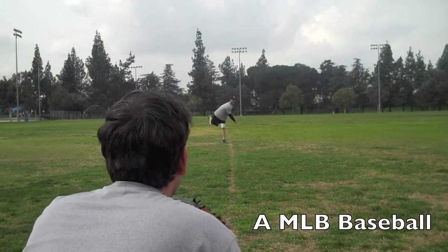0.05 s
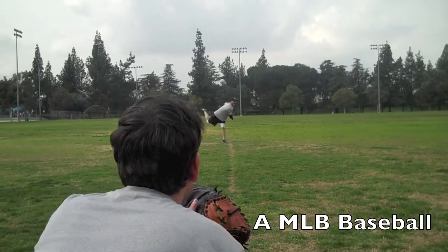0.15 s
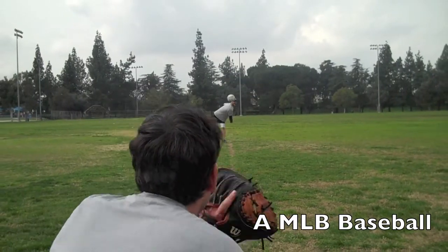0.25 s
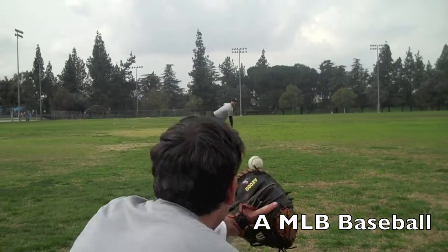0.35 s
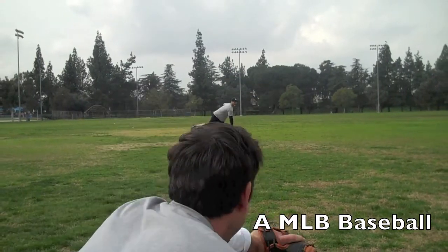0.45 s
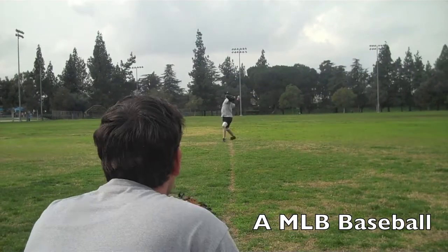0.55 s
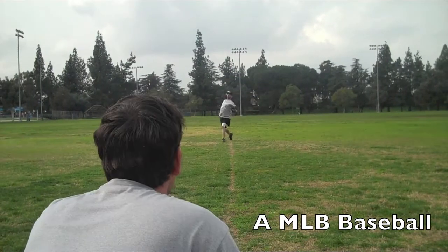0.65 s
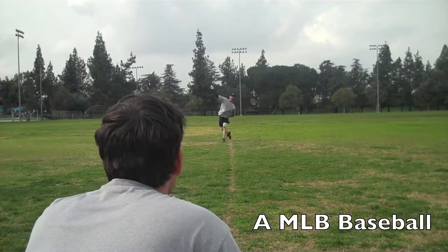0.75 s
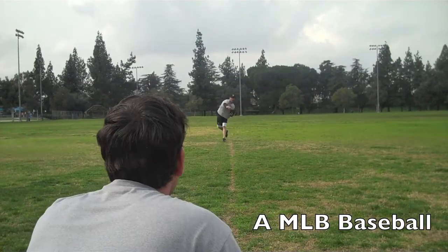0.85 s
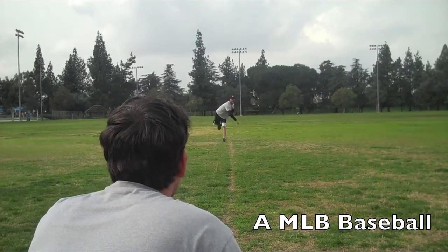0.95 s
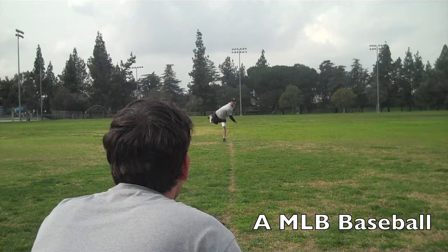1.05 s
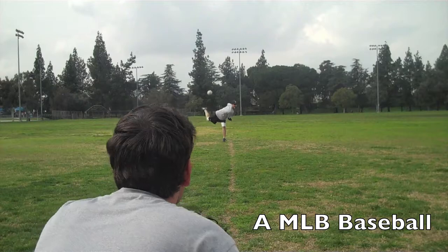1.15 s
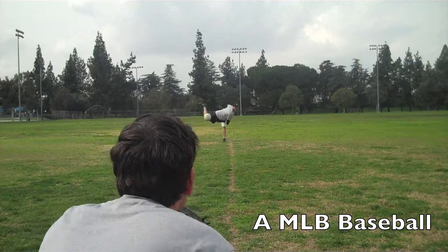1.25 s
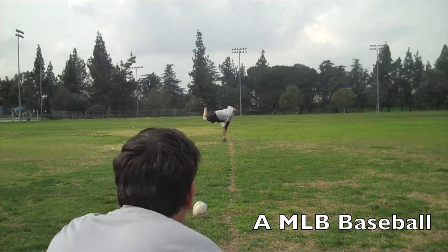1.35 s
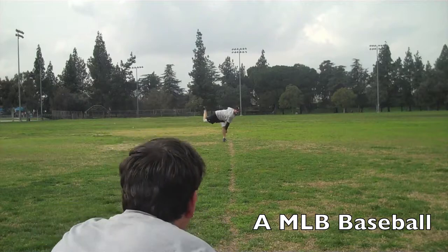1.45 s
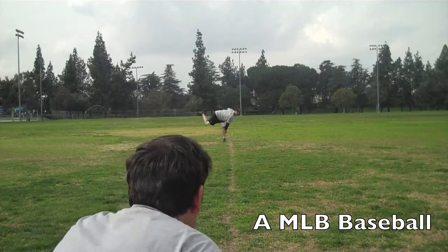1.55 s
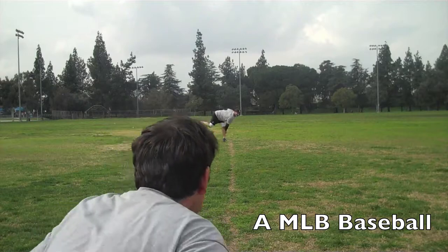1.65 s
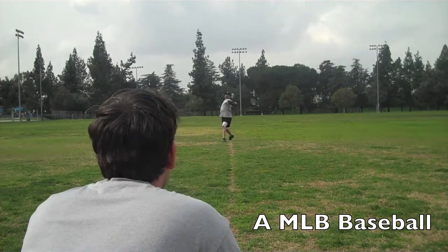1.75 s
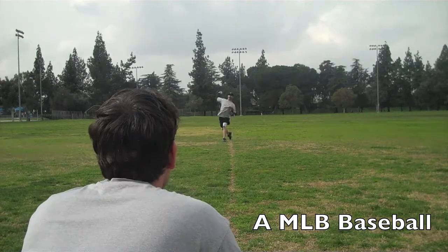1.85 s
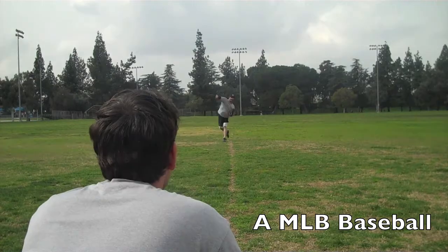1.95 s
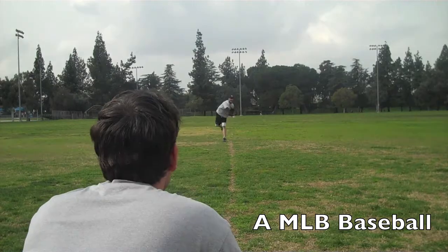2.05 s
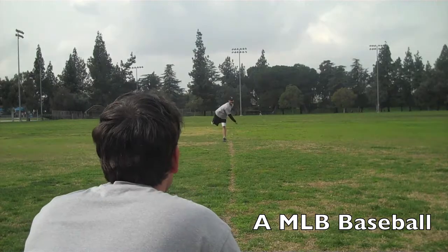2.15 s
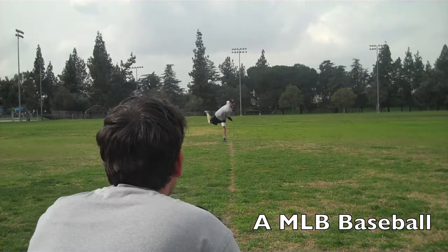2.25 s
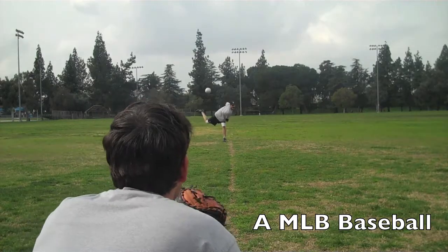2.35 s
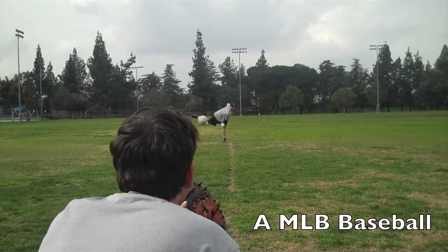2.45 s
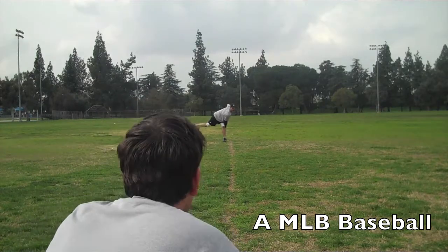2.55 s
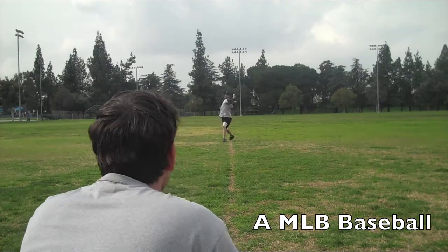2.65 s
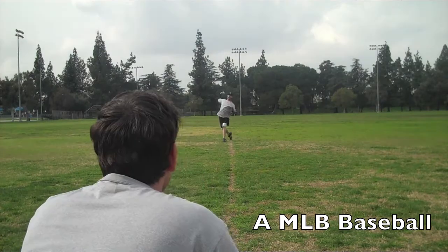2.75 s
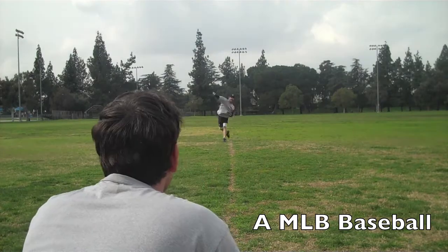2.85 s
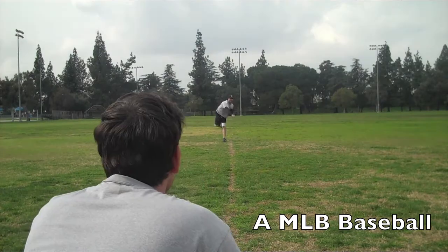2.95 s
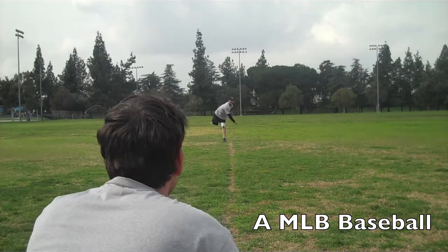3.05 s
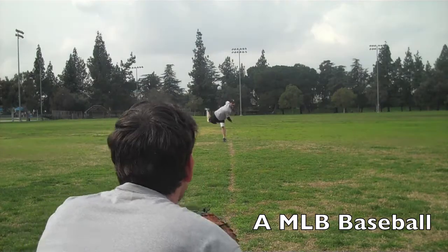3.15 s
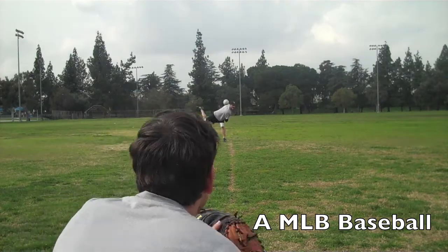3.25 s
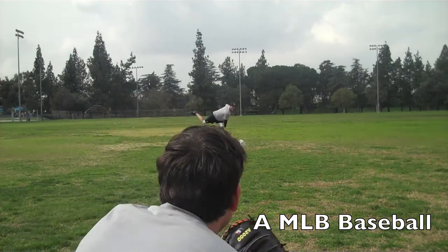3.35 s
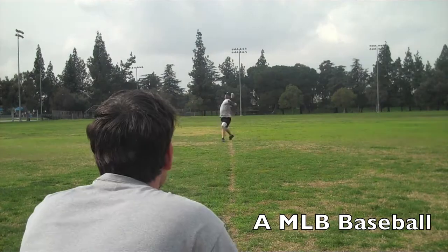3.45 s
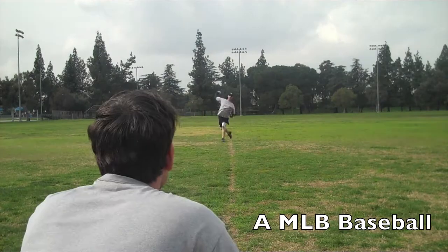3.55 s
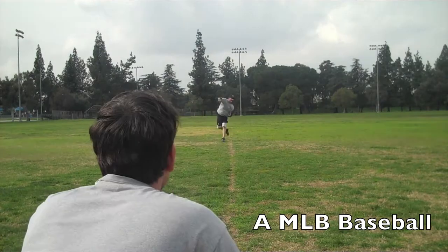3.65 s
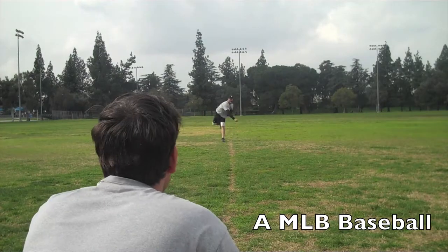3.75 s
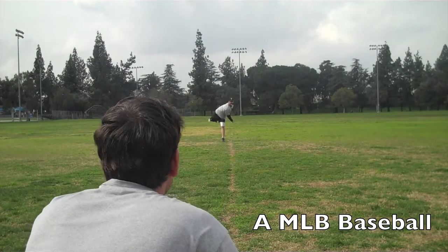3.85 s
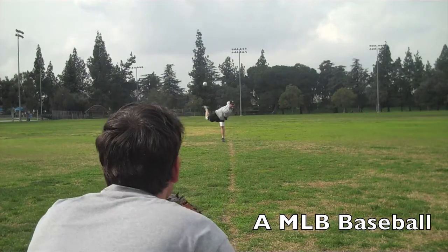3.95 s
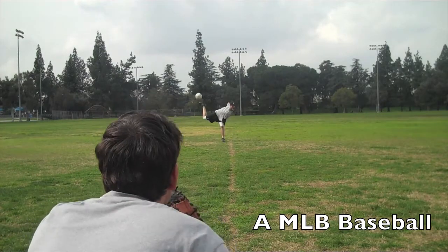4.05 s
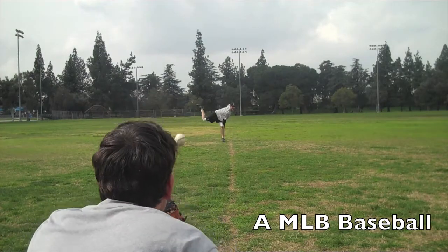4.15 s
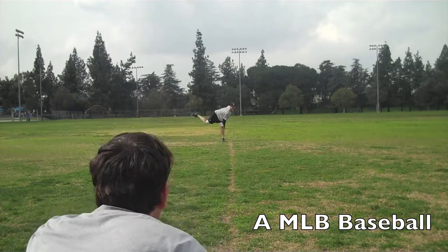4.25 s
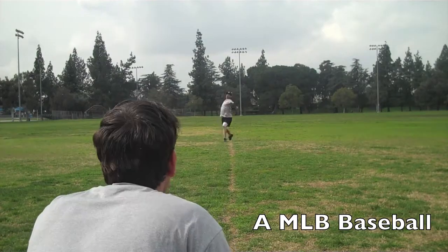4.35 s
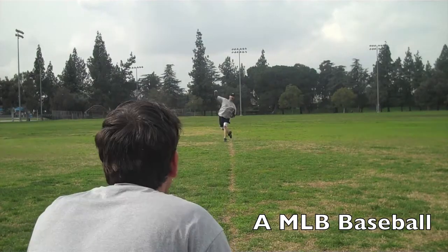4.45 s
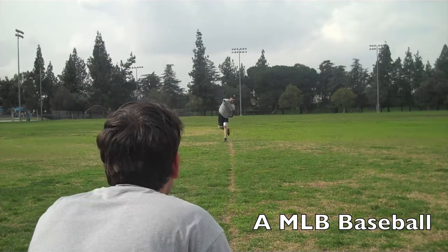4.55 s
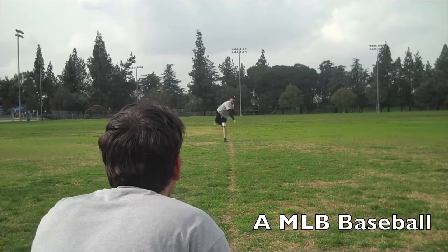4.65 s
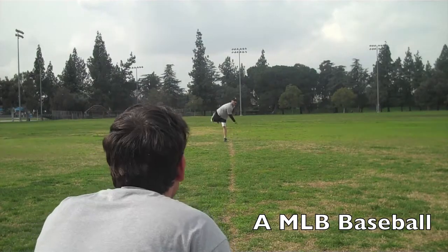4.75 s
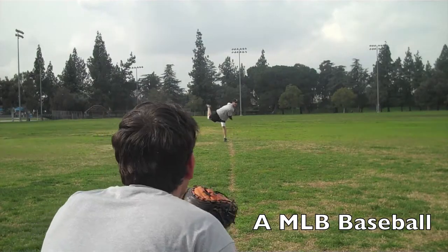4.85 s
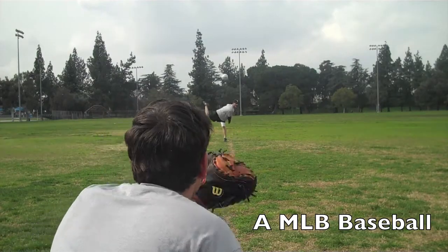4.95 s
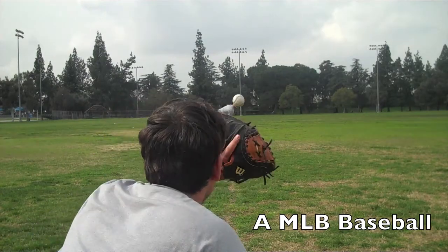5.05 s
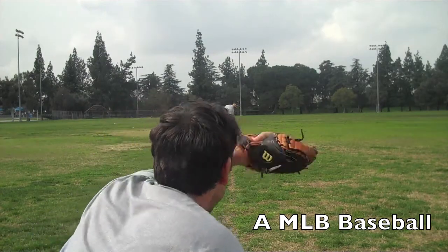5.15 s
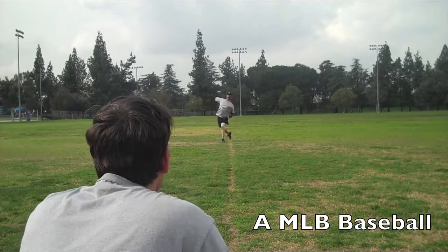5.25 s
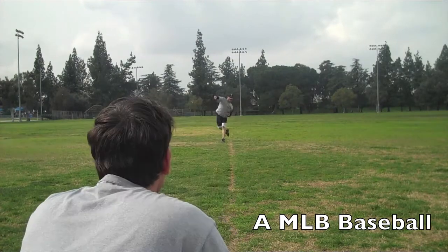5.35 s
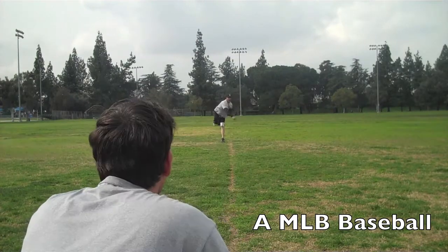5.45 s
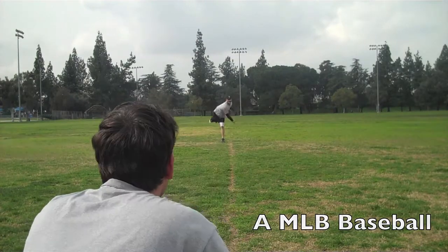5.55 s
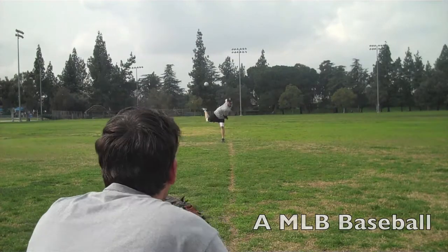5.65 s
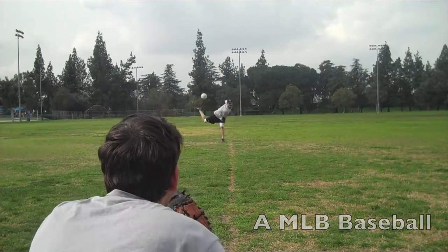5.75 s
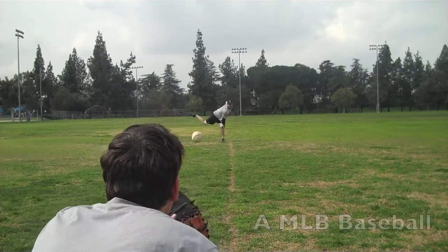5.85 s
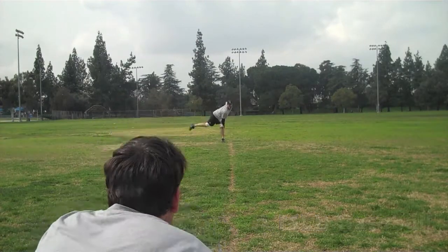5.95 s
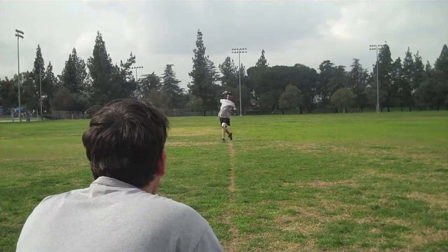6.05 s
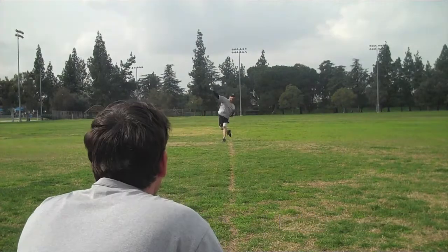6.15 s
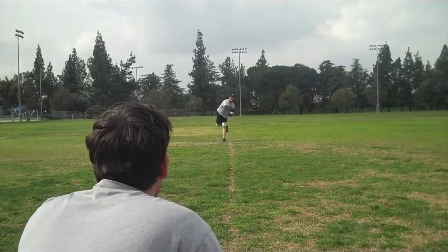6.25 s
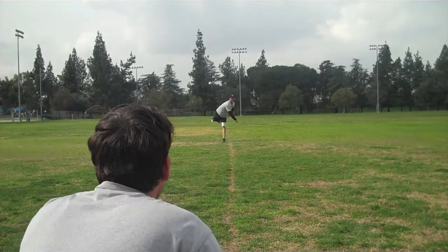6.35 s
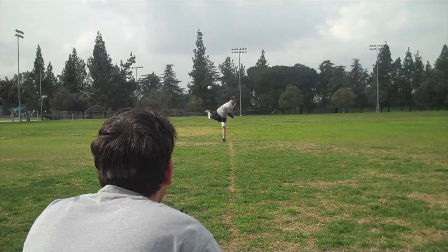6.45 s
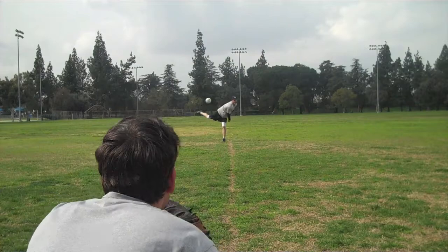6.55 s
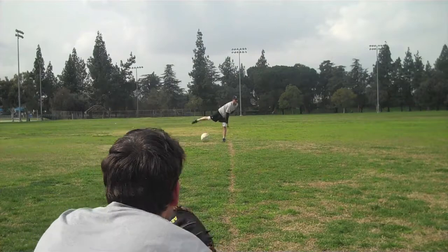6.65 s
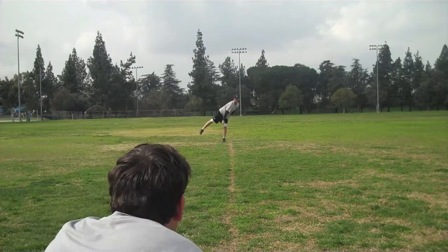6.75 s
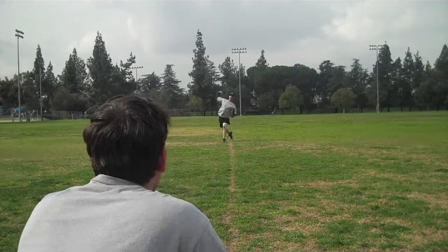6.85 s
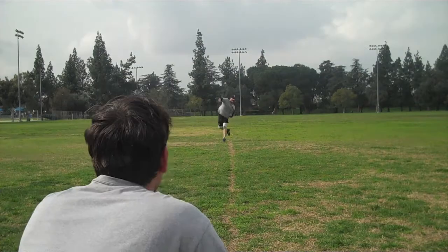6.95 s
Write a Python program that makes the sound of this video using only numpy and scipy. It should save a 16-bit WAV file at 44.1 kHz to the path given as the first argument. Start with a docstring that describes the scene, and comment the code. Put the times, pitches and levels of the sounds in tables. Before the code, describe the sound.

Close to the microphone, eight baseballs crack into a leather mitt, roughly one a second, each so loud it clips, with a short leathery ring and faint echo. Behind lies an open park: low far traffic, engine hums, thin hiss. Midway a helicopter thuds nearer, then roars past overhead; tiny bird chirps appear between catches. The background shifts at each cut.

```python
"""Far traffic rumbles and rushes over an open park field, then eight pitches smack into a leather mitt.
Traffic, hiss and a low rumble are coloured noise, with sliding sines for far engines. Each catch sums damped
resonances and noise bursts, clips flat, and returns as a near reflection and a faint tick from across the field.
Small birds are gliding sines; a helicopter approaches as pulses and chopped wash, then roars overhead.
The sound runs in nine stretches, each with its own field levels, joined by short fades."""
import sys
import numpy as np
from scipy import signal
from scipy.fft import rfft, irfft
from scipy.io import wavfile
from scipy.ndimage import uniform_filter1d

SR = 44100
rng = np.random.default_rng(int(sys.argv[2]) if len(sys.argv) > 2 else 0)


def master(y):
    """Save y as 16-bit WAV."""
    cut = np.clip(np.atleast_2d(y).T, -1, 1)
    pcm = np.round(cut * 32767)  # scale
    wavfile.write(sys.argv[1], SR, pcm.astype(np.int16))


N = 308259
TIME = np.arange(N) / SR
FAR_LAG_S = 0.00011  # far sounds reach the left port first


def undb(db):
    """Level law: decibels to an amplitude ratio."""
    return 10 ** (np.asarray(db) / 20)


def noise(colour, size, comb_s=0., comb=0.):
    """Spectral shaping: noise of rms 1 with a (frequency, level) colour; a delayed ground bounce may comb it."""
    hz = np.maximum(np.fft.rfftfreq(size, 1 / SR), 1)
    points, db = np.transpose(colour)
    rolloff = np.minimum(points[-1] / hz, 1) ** 3  # above the last point
    gain = undb(np.interp(np.log(hz), np.log(points), db)) * rolloff
    bounce = comb * np.exp(-2j * np.pi * hz * comb_s)
    gain = gain * np.abs(1 + bounce)
    x = irfft(rfft(rng.standard_normal(size)) * gain, size)
    return x / x.std()


def pair(colour, size, width, pan_db=0., comb_s=0., comb=0., lag_s=0.):
    """Partial coherence: two ports share mid noise and differ by side noise; the right may hear it later."""
    mid = noise(colour, size, comb_s, comb)
    side = noise(colour, size, comb_s, comb)
    sign = np.array([[1], [-1]])
    both = (mid + width * sign * side) / np.hypot(1, width)
    left, right = both * undb(sign * pan_db / 2)  # positive pan favours the left
    return np.array([left, np.roll(right, round(lag_s * SR))])


def decay(t, t60):
    """Exponential damping: a fall of 60 dB in t60 seconds, silent before t = 0."""
    return (t >= 0) * np.exp(-np.log(1000) * np.maximum(t, 0) / t60)


def mode(t, hz, t60):
    """Free vibration: one damped resonance."""
    return np.sin(2 * np.pi * hz * t) * decay(t, t60)


def add(out, start, x):
    """Superposition: mix x into out from a given time [s] on."""
    i = max(int(start * SR), 0)
    out[:, i:i + x.shape[-1]] += x[..., :N - i]


def glide(length, first_hz, last_hz):
    """Frequency modulation: a sine of rms 1 whose phase accumulates a linearly sliding pitch."""
    hz = np.linspace(first_hz, last_hz, int(length * SR))
    return np.sqrt(2) * np.sin(2 * np.pi * np.cumsum(hz) / SR)


def walk(rate):
    """Random fluctuation: values drawn at a rate [Hz], smoothed twice, with standard deviation 1."""
    k = int(SR / rate)
    steps = np.repeat(rng.standard_normal(N // k + 1), k)
    x = uniform_filter1d(uniform_filter1d(steps, k), k)[:N]
    return x / x.std()


# hum of far engines, sinking as they pass:
# (start [s], end [s], first pitch [Hz], last pitch [Hz], level [dB])
ENGINE_HUMS = [(0, 0.658, 119.5, 115.7, -40), (0, 0.285, 359, 346, -51), (.66, 1.84, 121, 118.8, -45.5),
               (1.861, 2.74, 329, 271.2, -49), (1.858, 2.736, 260.2, 238.7, -47.5)]


def engines():
    """Gliding tones: far engines hum as sines that sink in pitch and waver in level."""
    out = np.zeros((2, N))
    for start, end, first_hz, last_hz, db in ENGINE_HUMS:
        tone = glide(end - start, first_hz, last_hz)
        waver = undb(1.7 * walk(10))[:len(tone)]
        add(out, start, undb(db) * tone * waver * signal.windows.tukey(len(tone), .1))
    return out


# stretches of the field: (start [s], mean rumble level [dB], hiss level at the start [dB])
STRETCHES = [(-.2, -39, -63.5), (0.643, -36.5, -66.5), (1.843, -35.5, -60.5), (2.746, -37, -63),
             (3.551, -39.5, -62.5), (4.446, -39.5, -64.5), (5.347, -40.5, -60), (6.118, -43, -62),
             (6.916, -40, -66)]
# colours of traffic rumble, traffic rush and thin hiss: (frequency [Hz], level [dB])
RUMBLE_COLOUR = [(20, -23), (40, -10.5), (62, 2), (115, -1), (160, -3.5), (250, -6.5), (380, -13.5),
                 (600, -20.5), (1500, -76.5)]
TRAFFIC_COLOUR = [(60, -13), (300, -1.5), (450, 0.5), (650, 0.5), (1000, 3), (1500, -3), (2200, -8.5),
                  (3300, -20), (5000, -30), (12000, -46)]
HISS_COLOUR = [(1500, -7), (3000, -0.5), (4700, -5), (6400, 1), (7800, -0.5), (9000, -11.5), (10500, -17),
               (14000, -21), (15000, -45)]
TRAFFIC_DB, LOW_RUMBLE_DB = -48.5, -56.5  # means of drifting levels
HISS_SWELL_DB_PER_S, HISS_SWELL_S = 9, .8


def field(stretch, age):
    """Diffuse ambience: drifting noise makes traffic and low rumble; a thin hiss swells from each stretch's start."""
    _, rumble_db, hiss_db = np.array(STRETCHES)[stretch].T
    rumble = undb(rumble_db + 1.7 * walk(6.5)) * pair(RUMBLE_COLOUR, N, width=0.19, pan_db=-0.6)
    rush = pair(TRAFFIC_COLOUR, N, width=0.31, pan_db=-0.3, lag_s=FAR_LAG_S)
    traffic = undb(TRAFFIC_DB + 1.2 * walk(2.1)) * rush
    hiss_level_db = hiss_db + HISS_SWELL_DB_PER_S * np.minimum(age, HISS_SWELL_S)
    hiss = undb(hiss_level_db) * pair(HISS_COLOUR, N, width=0.92, pan_db=1.0, lag_s=FAR_LAG_S)
    # low rumble, almost separate at each port
    low_rumble_colour = [(15, -8), (35, 3.5), (80, 3.0), (200, -11.0), (600, -37.5), (2000, -61.5)]
    low_rumble = undb(LOW_RUMBLE_DB + 2.3 * walk(4.1)) * pair(low_rumble_colour, N, width=1.7)
    return rumble + traffic + hiss + low_rumble + engines()


# catches: (time [s], force [dB], pocket pitch [Hz], slap pitch [Hz], web snap pitch [Hz], palm thump pitch [Hz],
# thump re force [dB], slap re force [dB], sizzle gain [dB], far echo gain [dB])
MITT_CATCHES = [ (0.445, 18, 631, 824, 1254, 237, -17, 2, -22, -36.5),
                (1.4358, 13.5, 459, 853, 2416, 223, -10.5, -7, -17.5, -36.5),
                (2.6078, 17, 572, 800, 2383, 189, -27, -12, -17.5, -40.5),
                (3.5, 19, 373, 730, 1320, 270, -6, -9.5, -23, -58),
                (4.2802, 16, 509, 783, 2356, 435, -13, -11, -22, -47),
                (5.1886, 19, 566, 772, 1238, 419, -28, -7, -21.5, -50),
                (5.9935, 19.5, 846, 597, 2223, 173, -19, -2, -14, -28.5),
                (6.8046, 17.5, 753, 1014, 1455, 348, -12.5, 1.5, -25, -48.5)]
# ring of the leather shell: (mean frequency [Hz], level before RING_DB [dB], 60 dB decay time [s])
SHELL_MODES = [(125, -14, 0.056), (246.5, -23.5, 0.053), (400, -22, 0.069), (630, -19, 0.042),
               (725, -14, 0.045), (984, -18, 0.042), (1364, -24, 0.018), (2790, -19.5, 0.013)]
# colours of the first crack and of the sizzle after it: (frequency [Hz], level [dB])
CRACK_COLOUR = [(150, -8), (900, 13.5), (2200, 0), (3800, -9.5), (6500, 1), (9000, -13.5), (15000, -24.5)]
SIZZLE_COLOUR = [(200, -4), (900, 6.5), (2000, -1.5), (4400, -7), (6700, 2), (8000, -1), (9800, -17.5),
                 (14000, -15)]
THUMP_T60_S, POCKET_T60_S = 0.018, 0.0086
SNAP_DB, CRACK_DB = -8.5, -5  # against the force
RING_DB, RING_DELAY_S, RING_SPREAD = -1, .0035, 0.033  # spread is a fraction of each pitch
NEAR_DB, NEAR_S, ECHO_S = -30.5, .0435, .1035  # reflection from close by; delays after the catch
PORT_LAG_S = .00005  # the mitt is slightly to the right


def catches():
    """Impact excitation: the ball squeezes air from the pocket, thumps the palm and rings leather and laces."""
    out, size = np.zeros((2, N)), SR // 5
    t = np.arange(size) / SR
    ports = t - np.array([[PORT_LAG_S], [0]])
    lean = undb(0.55 * np.array([[1], [-1]]))  # the pocket is louder at the right port, the slap at the left
    near_colour = [(150, -13.0), (600, 11.5), (1200, -14.5), (3000, -24.5), (6500, -20.5), (10000, -37)]
    far_colour = [(400, -14), (1500, -8), (3200, 18.0), (6500, 15.0), (9000, -31), (14000, -33)]
    for (start, force_db, pocket_hz, slap_hz, snap_hz, thump_hz,
         thump_db, slap_db, sizzle_db, echo_db) in MITT_CATCHES:
        pocket = mode(ports, pocket_hz, POCKET_T60_S) / lean
        slap = undb(slap_db) * mode(ports, slap_hz, POCKET_T60_S)
        snap = undb(SNAP_DB) * mode(ports, snap_hz, POCKET_T60_S)
        leather = lean * (slap + snap)
        thump = undb(thump_db) * mode(ports, thump_hz, THUMP_T60_S)
        crack = undb(CRACK_DB) * pair(CRACK_COLOUR, size, width=0.63, pan_db=2.5) * decay(t, 0.011)
        # the shell rings once the ball has sunk in, flexed a little differently at every catch
        ring = np.zeros((2, size))
        for hz, db, t60 in SHELL_MODES:
            flexed_hz = hz * (1 + RING_SPREAD * rng.standard_normal())
            ring += undb(db + RING_DB) * mode(ports - RING_DELAY_S, flexed_hz, t60)
        fall = decay(t, 0.064) + undb(-38) * decay(t, 0.39)  # quick fall with a faint tail
        sizzle = undb(sizzle_db) * pair(SIZZLE_COLOUR, size, width=0.3, pan_db=4.5) * fall
        sizzle = sizzle * undb(3.2 * walk(500)[:size])  # laces and web flap unevenly
        add(out, start, undb(force_db) * (pocket + leather - thump + crack) + ring + sizzle)
        # a near reflection keeps its body; the far one comes back as a thin tick
        near = pair(near_colour, size, width=.3) * np.tanh(t / 0.00075) * decay(t, 0.04)
        add(out, start + NEAR_S, undb(NEAR_DB) * near)
        far = pair(far_colour, size, width=0.24) * decay(t, 0.011)
        add(out, start + ECHO_S, undb(echo_db) * far)
    return out


# bird calls: (time [s], number of notes, note length [s], first pitch [Hz], last pitch [Hz],
# level before buzz and swell [dB])
BIRD_CALLS = [(1.95, 1, 0.03, 6160, 6660, -61), (3.88, 1, .17, 8160, 7400, -65),
              (4.755, 1, 0.025, 5940, 7850, -52), (5.58, 1, .045, 6750, 6200, -61),
              (6.16, 4, 0.043, 7070, 6100, -63), (6.324, 1, 0.27, 2805, 2920, -66.5)]
NOTE_EVERY_S = .086


def birds():
    """Amplitude-modulated glides: thin, slightly buzzy notes from the trees, alone or in an even run."""
    out = np.zeros((2, N))
    for start, count, length, first_hz, last_hz, db in BIRD_CALLS:
        note = glide(length, first_hz, last_hz)
        for k in range(round(count)):
            buzz = 1 + .7 * walk(300)[:len(note)]
            add(out, start + k * NOTE_EVERY_S, undb(db) * note * buzz * np.hanning(len(note)))
    return out


# colours of the approaching wash, the wash overhead and the low roar overhead: (frequency [Hz], level [dB])
APPROACH_COLOUR = [(60, 9), (200, 5.5), (350, 5.5), (700, 2), (1400, -5.5), (2100, -12.5), (3000, -19.5),
                   (5000, -59)]
OVERHEAD_COLOUR = [(300, 4), (560, 4), (950, 3), (1400, -2), (2200, -14.5), (3300, -21.5), (6000, -51)]
ROAR_COLOUR = [(150, -22.5), (270, -12.5), (350, 9), (420, -5), (520, -0.5), (700, -24.5), (1500, -56.5)]
# wash overhead, before the blades modulate it: (time [s], level [dB])
OVERHEAD_LEVEL = [(3.66, -30), (3.85, -40.5), (4.1, -31.5), (4.25, -41.5)]
BLADE_HZ, BLADE_PASS_S, TAIL_ROTOR_HZ = 23.2, 2.9853, 82.5
# approaching: the blades thud evenly while the wash steps up (wash levels before modulation)
THUD_DB, TAIL_HUM_DB = -33, -41
WASH_FAR_DB, WASH_NEAR_DB, NEARING_S, NEARING_TAKES_S = -41, -31, 3.19, 0.12
# overhead: the roar peaks as it passes and falls away on either side
PASSES_S, ROAR_DB, ROAR_FALL_DB_PER_S = 3.91, -31.5, 15.5


def helicopter(stretch):
    """Blade-passage modulation: thuds and wash approach, then roar and wash pass; ground bounce combs the wash."""
    from_blade = (((TIME - BLADE_PASS_S) * BLADE_HZ + .5) % 1 - .5) / BLADE_HZ  # seconds to the nearest pass
    # each blade sends a push of pressure flanked by dips
    thud = np.cos(2 * np.pi * 108 * from_blade - .3) * np.exp(-(from_blade / 0.0037) ** 2)
    thuds = undb(THUD_DB + 0.65 * walk(25)) * thud / thud.std()
    swish = 1 + 0.13 * np.cos(2 * np.pi * BLADE_HZ * from_blade)
    # the small tail rotor chops the wash much faster and hums on its third harmonic
    chop = 1 + .5 * np.cos(2 * np.pi * TAIL_ROTOR_HZ * TIME)
    hum = undb(TAIL_HUM_DB) * np.sqrt(2) * np.sin(2 * np.pi * 3 * TAIL_ROTOR_HZ * TIME)
    nearness = (1 + np.tanh((TIME - NEARING_S) / NEARING_TAKES_S)) / 2
    wash_gain = undb(WASH_FAR_DB + (WASH_NEAR_DB - WASH_FAR_DB) * nearness) * swish * chop
    wash = wash_gain * pair(APPROACH_COLOUR, N, width=.1, comb_s=.00146, comb=.45, lag_s=FAR_LAG_S)
    coming = thuds + hum + wash

    roar_gain = undb(ROAR_DB - ROAR_FALL_DB_PER_S * np.abs(TIME - PASSES_S))
    roar = roar_gain * pair(ROAR_COLOUR, N, width=0.12)
    wash_gain = undb(np.interp(TIME, *np.transpose(OVERHEAD_LEVEL))) * swish
    wash = wash_gain * pair(OVERHEAD_COLOUR, N, width=.1, comb_s=.0022, comb=.55, lag_s=FAR_LAG_S)
    above = roar + wash
    return coming * (stretch == 3) + above * (stretch == 4)  # stretches count from 0


def timeline():
    """Segmentation: each sample's stretch, the time since that stretch began and the time until it ends."""
    starts = np.array(STRETCHES)[:, 0]
    stretch = np.searchsorted(starts, TIME) - 1
    ends = np.append(starts[1:], np.inf)
    return stretch, TIME - starts[stretch], ends[stretch] - TIME


def scene():
    """Superposition: the mitt in front of everything far away."""
    stretch, age, _ = timeline()
    return field(stretch, age) + catches() + birds() + helicopter(stretch)


FADE_OUT_S, FADE_IN_S = 0.12, 0.1
CLIP_LEVEL, BASS_CUT_HZ, TOP_HZ = .83, 40, 14400


def record(dry):
    """Overload and band-limiting: loud pops clip flat, deep bass and top are cut, and stretches fade."""
    _, age, left = timeline()
    fade = np.clip(np.minimum(age / FADE_IN_S, left / FADE_OUT_S), .02, 1)
    clipped = np.clip(dry, -CLIP_LEVEL, CLIP_LEVEL)
    bass_cut = signal.butter(1, BASS_CUT_HZ, "high", fs=SR, output="sos")
    thinned = signal.sosfilt(bass_cut, clipped)
    top_cut = signal.ellip(8, .1, 50, TOP_HZ, fs=SR, output="sos")
    return signal.sosfiltfilt(top_cut, thinned * fade)


dry = scene()
out = record(dry)
master(out)
```